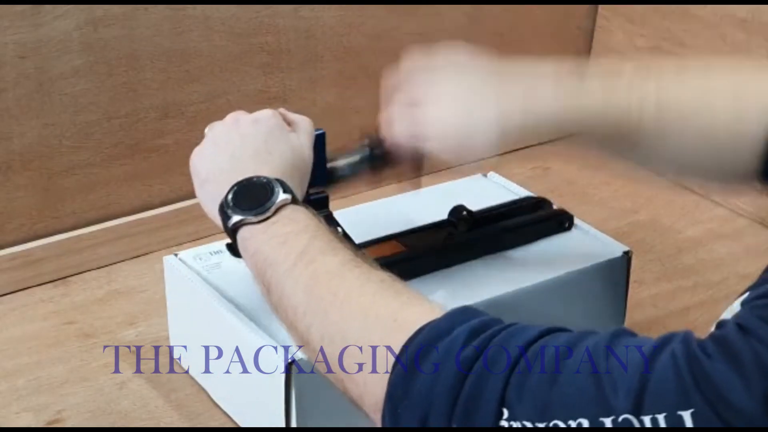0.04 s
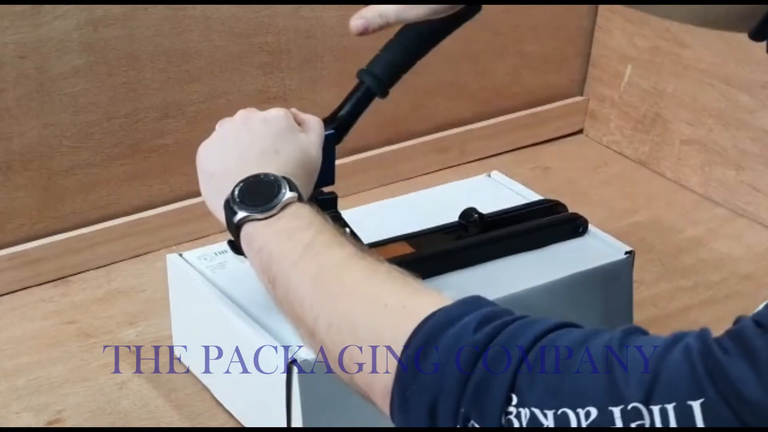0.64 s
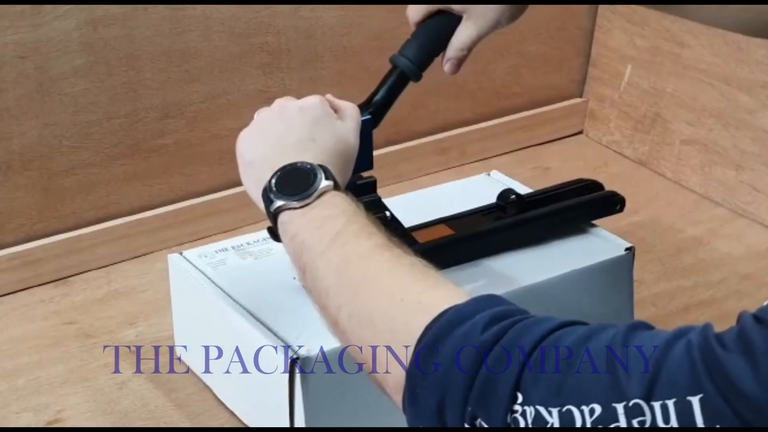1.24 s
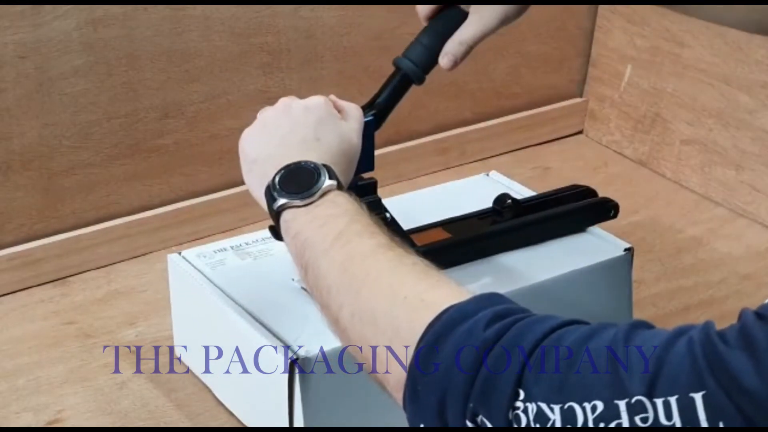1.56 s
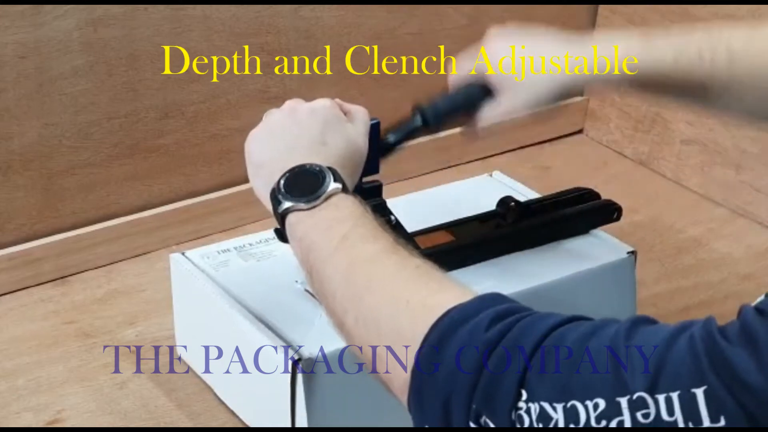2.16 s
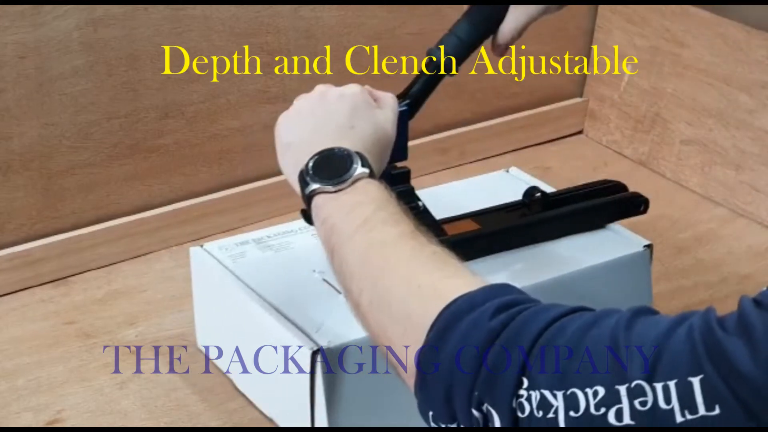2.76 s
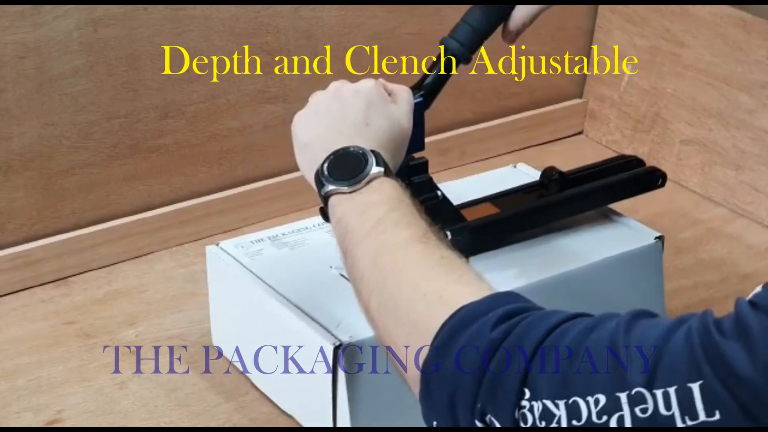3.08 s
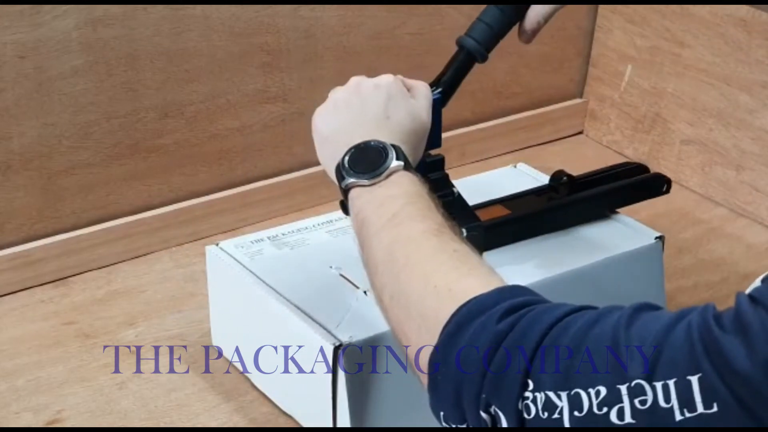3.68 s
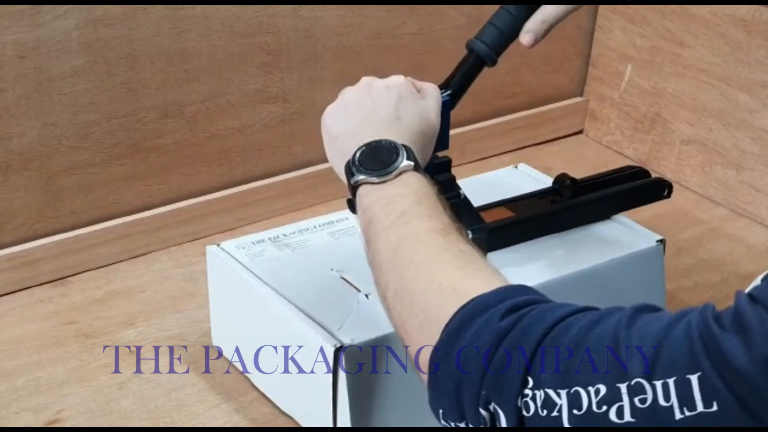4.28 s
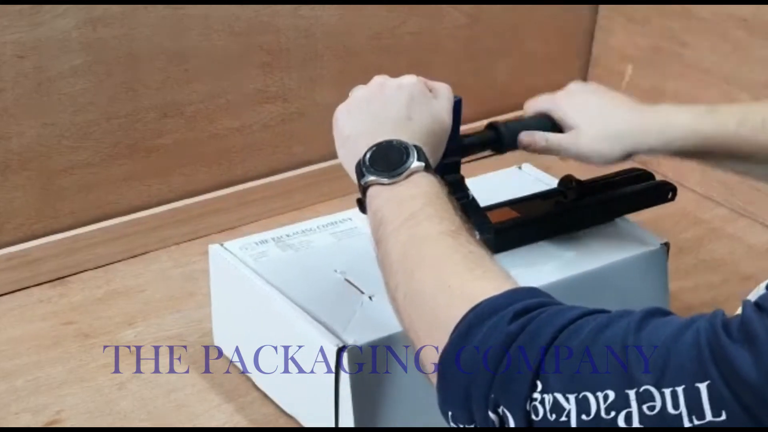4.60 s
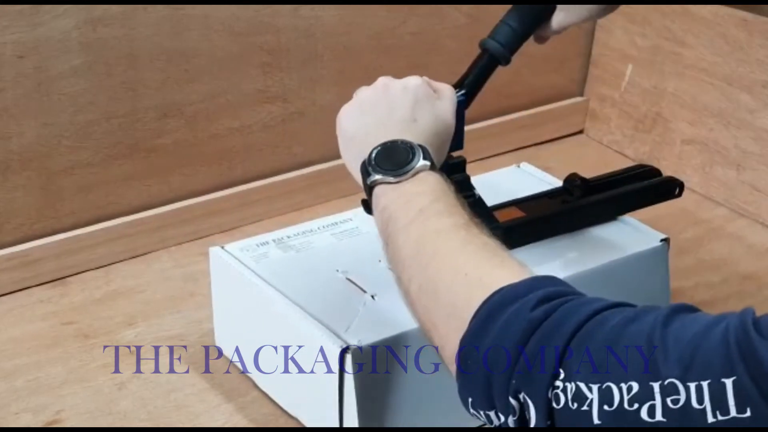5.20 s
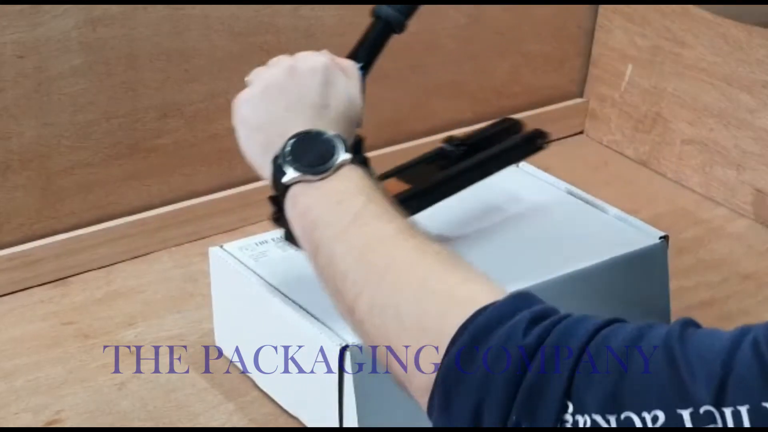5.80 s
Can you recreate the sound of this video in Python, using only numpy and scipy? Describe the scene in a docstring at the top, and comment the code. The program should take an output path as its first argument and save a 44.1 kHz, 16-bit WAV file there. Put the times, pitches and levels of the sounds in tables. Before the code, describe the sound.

A hand-lever stapler works on a cardboard box, heard close in a small wood-lined room with a short reverberation. Right at the start comes a loud, quick crunch of metal impacts and a hollow thud as a staple pierces the board. A brief rising scrape follows, and at 0.45 seconds the lever hits its stop with a ringing metallic clack. The tool knocks and scuffs lightly on the box until about 1.4 seconds. A second crunching thud lands at 1.85 seconds, with the return clack at 2.25. A hollow bump and a soft slide follow around 2.6 seconds, then sparse, faint knocks. The third staple crunches in at 4.5 seconds, and the lever clacks back at 4.85, with a small boom from the box. Very faint knocks and sleeve rustles trail off by 5.7 seconds. A quiet low room drone runs underneath throughout.

```python
"""A hand-lever stapler drives three staples into a cardboard box in a small wood-lined room.
At 0 s the driver slides down; a crunching run of impacts shears off a staple, pierces the board and
clenches it. The box springs back, the driver scrapes up, and at 0.45 s the lever clacks on its stop.
The tool is rocked and slid along the box, and the cycle repeats at 1.85 s and 4.47 s.
Last come faint knocks and sleeve rustles over the low drone of the room."""
import sys
import numpy as np
from scipy import signal
from scipy.fft import rfft, irfft
from scipy.io import wavfile
from scipy.ndimage import uniform_filter1d

SR = 44100
rng = np.random.default_rng(int(sys.argv[2]) if len(sys.argv) > 2 else 0)


def transcribe(u):
    """Save the signal u as a 16-bit wav file named by the first command-line argument.

    u: samples, shape (n,) or (channels, n), limited to [-1, 1]; the rate is SR.
    q: integer samples, one column per channel.
    """
    v = np.clip(np.atleast_2d(u).T, -1, 1)
    q = np.round(v * 32767).astype(np.int16)
    wavfile.write(sys.argv[1], SR, q)


N = 261954

# Levels are relative. T60 is the time to decay by 60 dB; each band scales a chatter's base T60.
# Down-strokes: t/s of meeting the staple, travel/s, run-up scrape/dB, crunch/dB, recoil/dB, box thud/dB
STROKES = [(.003, 0.089, -43.5, -23.5, -28.5, -5.5), (1.851, 0.096, -46.5, -24, -17, -1),
           (4.465, 0.085, -42, -23, -25.5, -4.5)]
# Blows on the staple: t/s, level/dB, hardness/dB, base T60/s, favoured f/Hz, its level/dB
PRESSES = [(.009, -29.5, 4.5, 0.044, 890, -25), (.026, -18.5, 11, 0.053, 1050, -16),
           (.061, -18, 1, 0.22, 1691, -13), (.067, -10, -4, .1, 653.6, -10),
           (.082, -17, -4, .06, 312.5, -14), (0.103, -5.5, -3.5, .11, 704, -13.5),
           (1.856, -17, 3.5, 0.096, 715, -21.5), (1.875, -13, 3.5, 0.17, 90, -17),
           (1.906, -11.5, -7.5, 0.046, 520, -8), (1.926, -13, -5, 0.099, 175, -12.5),
           (1.953, -19, 1, 0.078, 206.6, -17.5), (4.470, -16.5, -1.5, 0.1, 976, -22.5),
           (4.491, -15.5, 6, 0.028, 3210, -15), (4.502, -13, -11.5, 0.27, 313, -9.5),
           (4.533, -5, -3, .12, 1806, -13), (4.552, -16.5, -0.5, 0.22, 755, -12)]
# Lever at its upper stop: t/s, level/dB, hardness/dB, return scrape/dB, bounce spacing/1,
# impact f/Hz, its level/dB, rebound f/Hz, its level/dB
STOPS = [(.451, -17, -2, -30.5, 1.34, 1660, -21.5, 2450, -16),
         (2.235, -17.5, 0.5, -30.5, 0.93, 1584, -19, 1210, -23),
         (4.837, -19, 1.5, -31.5, 1.05, 755, -13, 2810, -19)]
# Bounces at a stop: base delay/s, added level/dB, added hardness/dB, base T60/s
BOUNCES = [(0, 1.5, -2, .1), (.008, -0.5, 0, 0.074), (.016, 0, -1, .11), (.036, -14.5, 0, 0.17)]
# The tool rocking on the box: t/s, level/dB, hardness/dB, base T60/s
KNOCKS = [(.304, -33.5, 2.5, 0.13), (.315, -27, 6.5, 0.13), (.525, -31.5, 3, 0.39), (.583, -22, -4, 0.031),
          (.596, -32, -1.5, 0.12), (.902, -44, 4.5, 0.28), (1.003, -37.5, 8.5, 0.29),
          (1.038, -37.5, -10, 0.24), (1.2175, -40, -9.5, 0.1), (1.385, -38, -9, 0.14),
          (1.802, -55, 16, .09), (1.816, -42.5, 13, 0.24), (2.080, -36.5, -5.5, 0.11),
          (2.112, -24.5, 2.5, .18), (2.336, -29, -3.5, 0.11), (2.600, -31.5, -3.5, 0.071),
          (2.618, -42.5, -28, 0.16), (2.865, -66, 15.5, 0.11), (2.973, -52, 11.5, .2),
          (3.012, -50.5, -12.5, 0.11), (3.660, -38, -12.5, 0.13), (3.815, -50.5, -17, 0.17),
          (3.980, -40, -2.5, 0.13), (4.432, -40, 13.5, 0.077), (4.680, -26, 1, 0.17),
          (4.922, -33.5, -6, 0.14), (5.232, -52, -24.5, 0.15)]
# The foot sliding on cardboard, and a sleeve rustling: peak t/s, level/dB, swell/s, fade/s
SLIDES = [(0.911, -44.5, 0.0063, 0.016), (1.03, -39, 0.0314, 0.031), (1.395, -64, 0.0257, 0.049),
          (2.632, -48, 0.022, 0.15), (2.745, -50.5, 0.05, 0.091), (3.0, -56.5, 0.05, .025),
          (3.975, -64, 0.015, .02)]
RUSTLES = [(1.385, -81, .012, .02), (1.632, -68, 0.0075, .012), (3.98, -59, 0.0046, 0.014),
           (5.231, -65.5, 0.0033, .014), (5.36, -68, .016, 0.027), (5.427, -74, .005, .012),
           (5.705, -73, 0.0074, .015)]
# The steel foot catching as it starts to slide: t/s, level/dB
CATCHES = [(.898, -45.5), (1.004, -32)]
# Box panels sounding as the weight shifts: t/s, f/Hz, level/dB, T60/s
BOOMS = [(.70, 62.6, -46, 0.84), (2.599, 304.7, -23, .18), (4.884, 66, -36, 0.29),
         (4.921, 303.3, -26.5, 0.18), (5.369, 1230, -54.5, 0.1)]
# Thud, clack, ring and tick bands of an impact: lower f/Hz, upper f/Hz
IMPACT_BANDS = [(55, 300), (300, 1500), (1500, 5000), (5000, 18000)]
# Spectra of the impacts, the friction and the room noise: f/Hz, level/dB
PRESS_SPECTRUM = [(29, -40.5), (50, -4.5), (178, -5.5), (227, -9), (303, -6.5), (367, -4.5), (592, -7.5),
                  (652, -0.5), (809, -8), (1440, -12), (1700, -10.5), (2170, -21), (3030, -16.5),
                  (7540, -35), (15500, -39)]
STOP_SPECTRUM = [(47, -49), (80, -13.5), (211, -13), (456, -14.5), (741, -7.5), (903, -6.5), (1430, -7.5),
                 (1640, -6.5), (1870, -7), (2540, -4), (3620, -11.5), (6280, -16), (8550, -22),
                 (13300, -25.5), (15500, -28)]
KNOCK_SPECTRUM = [(35, -35.5), (60, -8.5), (339, 3.5), (448, -1.5), (679, -3.5), (855, -3), (1010, -6),
                  (2110, -21.5), (3420, -26), (4620, -38), (6230, -26), (7000, -35.5), (15000, -51.5)]
CRUNCH_SPECTRUM = [(30, -41.5), (80, -8), (190, -2), (400, -11.5), (700, -3), (1500, -9), (2200, -11),
                   (3200, -13), (4500, -16), (7500, -23.5), (15500, -30)]
SCRAPE_SPECTRUM = [(120, -40), (200, -18.5), (236, -14), (327, -4.5), (585, -12.5), (957, 1), (1110, -6.5),
                   (3010, -3), (3480, -10.5), (3820, 0), (4330, -16.5), (5590, -9), (9480, -17.5),
                   (11800, -14.5), (15500, -22.5)]
HISS_SPECTRUM = [(1000, -26), (3000, -8), (4000, -2.5), (4800, -5), (6200, 1.5), (8500, -7.5), (12000, -7),
                 (15500, -14.5)]
SLIDE_SPECTRUM = [(88, 1.5), (150, -15.5), (320, -5), (462, -11.5), (500, -24.5), (561, -15), (796, -7.5),
                  (930, -17.5), (1240, -7), (1600, -14), (1940, -12.5), (3280, -12.5), (4390, -22),
                  (5990, -17.5), (15500, -31.5)]
RUSTLE_SPECTRUM = [(800, -18.5), (2500, -11), (3400, -1.5), (4600, -15.5), (6100, 1), (8200, 0.5),
                   (9500, -27), (15000, -44)]
AIR_SPECTRUM = [(20, -12.5), (45, -5), (75, 1.5), (100, -4), (125, -7.5), (160, -17), (290, -18),
                (380, -23.5), (580, -17.5), (820, -21), (1000, -33), (1700, -31), (2300, -40),
                (15000, -59.5)]
# Modes of the frame and of the foot: f/Hz, T60/s, level/dB
FRAME_MODES = [(1353, 0.46, -15.5), (1810, .08, -9), (2480, .11, -9), (2660, .09, -8), (3040, 0.097, -10),
               (5000, 0.079, -12), (6490, 0.11, -8)]
FOOT_MODES = [(963, 0.12, 1.5), (1200, 0.3, -13), (3350, 0.13, -20)]
# Resonances of box and frame: f/Hz, bandwidth/Hz, level/dB re the direct sound
BODY_MODES = [(60, 7.2, -3), (177, 42, -4.5), (304, 3.7, 1.5), (410, 11, -3.5), (542, 61, -2.5),
              (638, 78, -4), (725, 30, -10), (770, 5.4, -5), (976.6, 13, -1.5), (1012, 2.1, -5.5),
              (1342, 2.6, 0.5), (1700, 18, -3.5), (1630, 22, -4), (1979, 15, -5), (2290, 12, -12.5),
              (2320, 7.5, -5.5), (3000, 32, -3.5), (3000, 200, -5.5), (3865, 68, -4), (5000, 19, -5.5),
              (5690, 81, 0.5), (6270, 60, -2), (8500, 16, -5)]
# Stereo width: f/Hz, side level/dB re mid
WIDTH = [(60, -21.5), (250, -14), (600, -6.5), (1200, -5.5), (2800, -1.5), (12000, 1.5)]
# Reverberation time: f/Hz, T60/s
ROOM_T60 = [(100, 0.82), (400, 0.2), (1200, 0.44), (3000, 0.27), (7000, 0.33), (14000, 0.11)]
# Reverberation strength: f/Hz, level/dB
ROOM_LEVEL = [(100, -9), (400, -12.5), (1200, -9.5), (3000, -6), (7000, -15.5), (14000, -12.5)]


def down_strokes(sag_db_per_s=55, recoil_delay_s=.019, recoil_t60=.082):
    """Impact and fracture: the board crunches, thuds more as the staple sinks, then springs back."""
    hits = []
    presses = band_levels(PRESSES, balance_db=(-5, -.5, -5, -16.5), hardening=(-.2, 0, 1.3, 1.1))
    for s, thud_db, *rest in presses:
        start, *_, box_db = min(STROKES, key=lambda stroke: abs(s - stroke[0]))
        hits.append((s, thud_db + box_db + sag_db_per_s * (s - start), *rest))
    force = 0
    recoil_balance_db = np.array((2, -10, -8, -22.5))
    for start, travel, _, crunch_db, recoil_db, _ in STROKES:
        end = start + travel
        hits.append((end + recoil_delay_s, *(recoil_db + recoil_balance_db), recoil_t60))
        force += amp(crunch_db) * push(start, end, rise_s=.012, fade_s=.023)
    blows = impacts(hits, PRESS_SPECTRUM, contact=(1, .22, .16, .11), uneven_db=5,
                    rise_s=(.02, .0012, .0019, .0065), t60_scale=(2.8, 1.1, 1.5, .95))
    crunch = friction(force, CRUNCH_SPECTRUM, uneven_db=8.5, judder_db=3.5, judder_samples=120)
    return amp(-3.5) * blows + amp(2.5) * crunch


def driver(run_up_s=.056, return_s=.25, hiss_s=.115):
    """Sliding friction grows with speed: the driver scrapes down, then ever faster up, ending in a hiss."""
    down = sum(amp(db) * push(s - run_up_s, s, rise_s=.023, power=2.2) for s, _, db, *_ in STROKES)
    up = sum(amp(db) * push(s - return_s, s, rise_s=return_s, power=2.66) for s, _, _, db, *_ in STOPS)
    last_stretch = sum(amp(db) * push(s - hiss_s, s, rise_s=.038) for s, _, _, db, *_ in STOPS)
    scrape = friction(down + up, SCRAPE_SPECTRUM, uneven_db=2.5, judder_db=-.34)
    hiss = friction(last_stretch, HISS_SPECTRUM, uneven_db=.5, judder_db=-2.6)
    return amp(-3.5) * scrape + amp(-18) * hiss


def lever_stop():
    """Inelastic rebound: the lever clacks against its stop and rattles to rest."""
    bounces = [(s + delay * spacing, db + added_db, hardness + harder, t60)
               for s, db, hardness, _, spacing, *_ in STOPS for delay, added_db, harder, t60 in BOUNCES]
    hits = band_levels(bounces, balance_db=(-12, .5, 2, .5), hardening=(1.3, 0, .94, 1.7))
    return amp(-4) * impacts(hits, STOP_SPECTRUM, contact=(.24, .2, .48, .14), uneven_db=1.5,
                             rise_s=(.01, .0014, .0026, .0012), t60_scale=(2, .92, 1.3, 1))


def handling():
    """Light impact and friction: the tool rocks and slides on the box while a sleeve rustles."""
    hits = band_levels(KNOCKS, balance_db=(-9.5, 0, -10, -25.5), hardening=(-.67, 0, 1.2, .95))
    knock = impacts(hits, KNOCK_SPECTRUM, contact=(.17, .46, .24, .04), uneven_db=6.5,
                    rise_s=(.0028, .0022, .0036, .005), t60_scale=(1.3, 1.1, .85, .9))
    slide = friction(swells(SLIDES), SLIDE_SPECTRUM, uneven_db=5, judder_db=1.86)
    rustle = friction(swells(RUSTLES), RUSTLE_SPECTRUM, uneven_db=5.5, judder_db=.5)
    return amp(-2) * (knock + slide) + amp(-4) * rustle


def ringing(base_rebound_s=.014):
    """Free vibration: box and frame ring on after blows; panels boom and the foot sings as it moves."""
    pressed = sum(tone(s, hz, db) for s, *_, hz, db in PRESSES)
    stopped = sum(tone(s, hz, db) + tone(s + base_rebound_s * spacing, rebound_hz, rebound_db)
                  for s, *_, spacing, hz, db, rebound_hz, rebound_db in STOPS)
    frame = damped_modes([stop[:2] for stop in STOPS], FRAME_MODES, rise_s=.004)
    panels = sum(tone(*boom) for boom in BOOMS)
    foot = damped_modes(CATCHES, FOOT_MODES)
    return pressed + stopped + frame + panels + foot


def band_levels(hits, balance_db, hardening):
    """Harder contact excites more treble. Gives t/s, thud/dB, clack/dB, ring/dB, tick/dB, base T60/s."""
    return [(s, *(db + np.array(balance_db) + hardness * np.array(hardening)), t60)
            for s, db, hardness, t60, *_ in hits]


def impacts(hits, spectrum, contact, uneven_db, rise_s, t60_scale, size=10240):
    """Impulsive excitation: in each band a sharp contact, then dying chatter; the thud lasts longest."""
    out, t = np.zeros((2, N)), np.arange(size) / SR
    response = minimum_phase(spectrum)
    bands = [signal.sosfilt(signal.butter(3, edges, "band", fs=SR, output="sos"), response)
             for edges in IMPACT_BANDS]
    for s, *levels_db, t60 in hits:
        for db, band, impulse, rise, scale in zip(levels_db, bands, contact, rise_s, t60_scale):
            envelope = (1 - np.exp(-t / rise)) * amp(-60 * t / (max(t60, .01) * scale))
            chatter = spread(grains(size, uneven_db) * envelope)
            chatter /= np.linalg.norm(chatter[0])
            chatter[:, 0] += impulse
            gain = amp(db) * np.sqrt(.01 * SR / size)  # the energy of this level held for 10 ms
            add(out, s, gain * unit(convolve(chatter, band)))
    return out


def friction(force, spectrum, uneven_db, judder_db, judder_samples=300):
    """Stick-slip noise: fine catches of a rubbing surface, bunched by an unsteady hand."""
    judder = amp(judder_db * unit(uniform_filter1d(rng.standard_normal(N), judder_samples)))
    catches = spread(grains(N, uneven_db)) * judder
    return force * unit(convolve(catches, minimum_phase(spectrum)))


def grains(count, uneven_db):
    """Dense micro-contacts with log-normal strengths, on two channels."""
    return unit(rng.standard_normal((2, count)) * amp(uneven_db * rng.standard_normal(count)))


def push(start, end, rise_s, fade_s=.0033, power=1):
    """A force that rises as a power law, holds until end and relaxes exponentially."""
    t = np.arange(N) / SR
    return np.clip((t - start) / rise_s, 0, 1) ** power * np.exp(-np.maximum(t - end, 0) / fade_s)


def swells(peaks):
    """A force that grows and decays exponentially about each peak."""
    t = np.arange(N) / SR
    return sum(amp(db) * np.exp(-np.maximum((s - t) / swell, (t - s) / fade))
               for s, db, swell, fade in peaks)


def damped_modes(hits, modes, rise_s=.00077):
    """Modal superposition: decaying sinusoids, the high ones less alike in phase left and right."""
    out, t = np.zeros((2, N)), np.arange(SR // 2) / SR
    onset = 1 - np.exp(-t / rise_s)
    for s, hit_db in hits:
        for (hz, t60, db), (phase, skew) in zip(modes, rng.uniform(-1, 1, (len(modes), 2))):
            phases = np.pi * phase + np.array([[1], [-1]]) * skew * amp(read(WIDTH, hz))
            envelope = amp(hit_db + db - 60 * t / t60) * onset
            add(out, s, envelope * np.sin(2 * np.pi * hz * t + phases))
    return out


def tone(s, hz, db, t60=.125):
    """A single damped oscillator, struck at time s."""
    return damped_modes([(s, db)], [(hz, t60, 0)])


def steel(x, count=64, low_hz=1800, high_hz=15000, width_hz=50):
    """High modal density: lever, spring and magazine give every contact the same metallic clink."""
    t = np.arange(SR // 5) / SR
    place, phase, skew = rng.random((3, count, 1))
    hz = low_hz * (high_hz / low_hz) ** ((np.arange(count)[:, None] + place) / count)
    modes = np.array([np.cos(2 * np.pi * (hz * t + phase) + side * skew).sum(0) for side in (-1, 1)])
    response = 2 * np.pi * width_hz / SR * np.exp(-np.pi * width_hz * t) * modes
    response[:, 0] += 1  # direct sound
    return convolve(x, response)


def body(x):
    """Resonance: contacts drive the modes of box and frame; the narrower a mode, the longer it rings."""
    t = np.arange(SR) / SR
    response = sum(amp(db) * 2 * np.pi * width / SR * np.exp(-np.pi * width * t)
                   * np.cos(2 * np.pi * hz * t) for hz, width, db in BODY_MODES)
    response[0] += 1
    return convolve(x, response[None])


def room(x, build_s=.036, size=256):
    """Reverberation: reflections off near wooden walls thicken into a short tail, the bass dying last."""
    build_up = 1 - np.exp(-(np.arange(SR) / SR / build_s) ** 2)
    hz, t, noise = signal.stft(spread(rng.standard_normal((2, SR))), SR, nperseg=size)
    rate = np.log(1000) / read(ROOM_T60, hz)[:, None]
    decay = np.exp(-rate * t) * np.sqrt(2 * rate / SR)  # unit energy at each frequency
    level = amp(read(ROOM_LEVEL, hz))[:, None]
    tail = signal.istft(noise * decay * level, SR, nperseg=size)[1][:, :SR]
    return x + convolve(x, tail * build_up)


def background(each_db=-57, hum_hz=60, half_width_hz=5):
    """Stationary noise: a soft broadband bed, and a narrow band heard as a wavering drone."""
    hz = np.fft.rfftfreq(N, 1 / SR)
    air = irfft(rfft(spread(rng.standard_normal((2, N)))) * amp(read(AIR_SPECTRUM, hz)), N)
    hum_peak = 1 / (1 + ((hz - hum_hz) / half_width_hz) ** 2)
    hum = irfft(rfft(spread(rng.standard_normal((2, N)))) * hum_peak, N)
    return amp(each_db) * (unit(air) + unit(hum))


def spread(pair):
    """Partial coherence: two independent signals become left and right, bass alike, treble diffuse."""
    mid, side = rfft(pair)
    width = amp(read(WIDTH, np.fft.rfftfreq(pair.shape[1], 1 / SR)))
    left_right = np.array([mid + width * side, mid - width * side])
    return irfft(left_right / np.sqrt(1 + width ** 2), pair.shape[1])


def minimum_phase(spectrum, size=2048):
    """The Hilbert relation gives the most compact causal response with this spectrum."""
    hz = abs(np.fft.fftfreq(size, 1 / SR))
    log_gain = np.log(amp(np.maximum(read(spectrum, hz), -100)))
    return np.fft.ifft(np.exp(np.conj(signal.hilbert(log_gain)))).real[None]


def convolve(x, response):
    """Linear filtering of each channel, cut to the input length."""
    return signal.fftconvolve(x, response, axes=1)[:, :x.shape[1]]


def add(mix, s, sound):
    """Superposes a stereo sound at time s."""
    part = mix[:, max(round(s * SR), 0):][:, :sound.shape[1]]
    part += sound[:, :part.shape[1]]


def read(points, hz):
    """Interpolation on a log-frequency axis."""
    f, value = np.transpose(points)
    return np.interp(np.log(hz + 1), np.log(f + 1), value)


def amp(db):
    """Level to amplitude ratio."""
    return 10 ** (np.asarray(db) / 20)


def unit(x):
    """Normalisation to rms 1."""
    return x / np.sqrt(np.mean(x ** 2) + 1e-20)


def scene():
    """Source and filter: impacts and friction pass through the tool and the box into the room."""
    contacts = down_strokes() + driver() + lever_stop() + handling()
    return room(body(steel(contacts)) + ringing()) + background()


def record(dry, ceiling=.93, cutoff_hz=15900):
    """Soft saturation rounds the loudest peaks; a low-pass filter then limits the band."""
    rounded = dry / (1 + (dry / ceiling) ** 8) ** (1 / 8)
    low_pass = signal.firwin(511, cutoff_hz, window=("kaiser", 9), fs=SR)
    return signal.oaconvolve(rounded, low_pass[None], "same")


dry = scene()
out = record(dry)
transcribe(out)
```